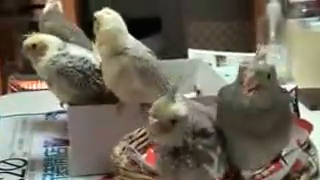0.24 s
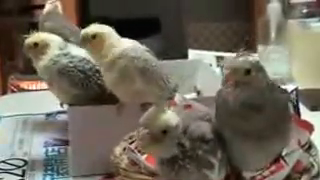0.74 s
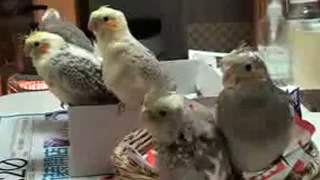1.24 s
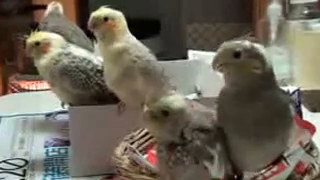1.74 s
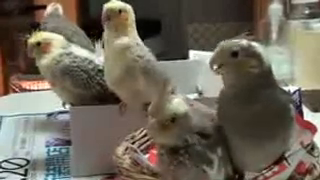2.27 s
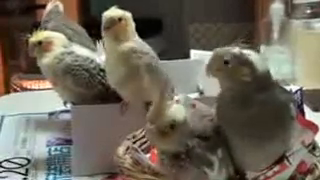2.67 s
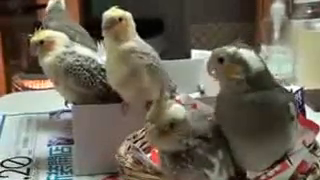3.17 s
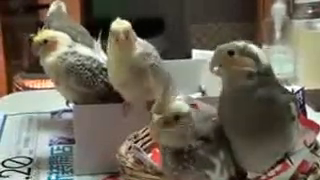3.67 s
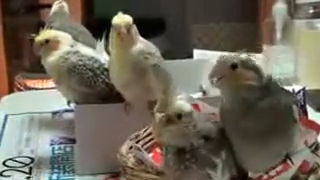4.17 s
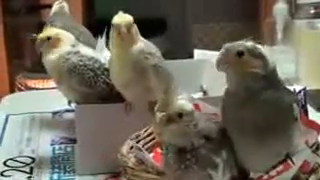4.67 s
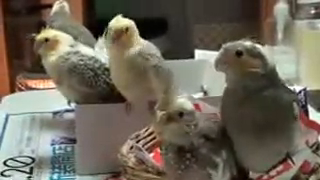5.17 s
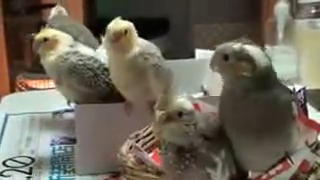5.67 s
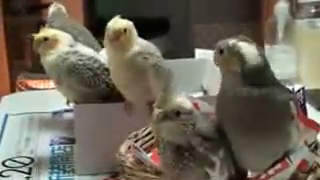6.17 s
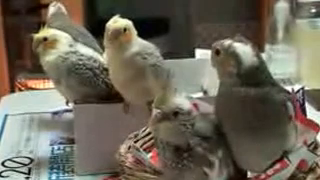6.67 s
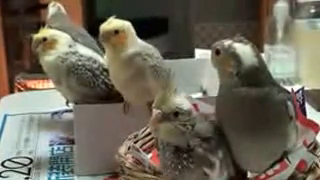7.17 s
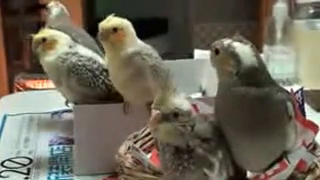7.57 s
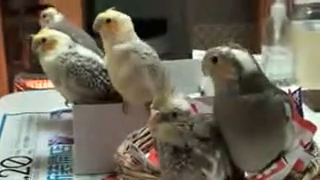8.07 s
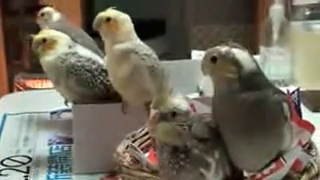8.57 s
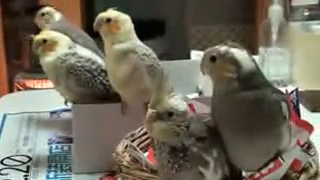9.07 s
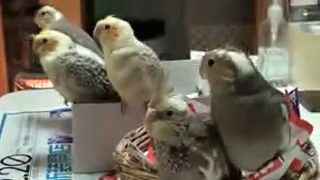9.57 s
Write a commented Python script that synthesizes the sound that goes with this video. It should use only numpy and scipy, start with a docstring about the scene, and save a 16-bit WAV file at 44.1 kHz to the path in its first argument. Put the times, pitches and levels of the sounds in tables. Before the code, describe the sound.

Raspy begging calls from young cockatiels repeat every half second or so, hiss turning to squeal, then thin out to sparse calls with quiet gaps.

```python
"""Cockatiel chicks beg for food in a small room. Each call starts as a hoarse, buzzing hiss; a rough tone
forms in it, clears, climbs with a warble to a squeal, and many calls end in a short upward yip. Now and then
one whines; a bird beats its wings, soft ticks sound late on, an appliance hums. Squeals and yips are whistles
with overtones, hisses are buzz and noise through throat resonances, whines are harmonic stacks, wings and
ticks are shaped noise; a room response and a narrow-band microphone with automatic gain follow."""
import sys
import numpy as np
from scipy import signal
from scipy.fft import rfft, irfft
from scipy.io import wavfile
from scipy.ndimage import uniform_filter1d

SR = 44100
rng = np.random.default_rng(int(sys.argv[2]) if len(sys.argv) > 2 else 0)


def waveform_to_disk(signal):
    """Save audio, clipped to [-1, 1], as 16-bit WAV at the path in sys.argv[1]."""
    frames = np.transpose(np.atleast_2d(signal))
    scaled = np.clip(frames, -1, 1) * 32767
    samples = np.round(scaled).astype(np.int16)
    wavfile.write(sys.argv[1], SR, samples)


N = 433503
TIME = np.arange(N) / SR


def from_db(db):
    """Decibels to amplitude gain."""
    return 10 ** (np.asarray(db) / 20)


def rms_one(x):
    """Scale to unit power."""
    return x / np.sqrt(np.mean(x ** 2) + 1e-20)


def at_hz(points, hz):
    """Interpolate (frequency [Hz], level [dB]) points on a log-frequency axis."""
    point_hz, point_db = np.transpose(points)
    return np.interp(np.log(np.maximum(hz, 1)), np.log(point_hz), point_db)


def noise(spectrum):
    """Unit-power Gaussian noise shaped by a spectrum."""
    gains = from_db(at_hz(spectrum, np.fft.rfftfreq(N, 1 / SR)))
    return rms_one(irfft(rfft(rng.standard_normal(N)) * gains, N))


def butter(x, hz, kind, order=2):
    """Causal low- or high-pass."""
    return signal.sosfilt(signal.butter(order, hz, kind, fs=SR, output="sos"), x)


def wander(rate_hz, size):
    """Random motion of unit spread, low-passed at the given rate."""
    settled = butter(rng.standard_normal(size + SR // 10), rate_hz, "low")[-size:]
    return rms_one(settled)


def resonate(x, hz, width_hz):
    """Two-pole resonance, about unit gain at its peak."""
    r = np.exp(-np.pi * width_hz / SR)
    zeros = np.array([1, 0, -1]) * (1 - r * r) / 2
    poles = [1, -2 * r * np.cos(2 * np.pi * hz / SR), r * r]
    return signal.lfilter(zeros, poles, x)


def gate(start_s, length_s, attack_s, release_s):
    """A call's sample indices, time since its start and on-off envelope."""
    first = max(int(start_s * SR), 0)
    last = min(int((start_s + length_s + release_s) * SR), N)
    at = np.arange(first, last)
    t = np.maximum(TIME[at] - start_s, 0)
    attack = np.clip(t / attack_s, 0, 1)
    release = np.clip(1 - (t - length_s) / release_s, 0, 1)
    return at, t, attack * release


def syrinx(pitch_hz, overtone_db, slope_db=-0.5):
    """Whistle of unit power with three overtones coloured by the beak; slope is dB per harmonic number."""
    # beak colour: (frequency [Hz], relative level [dB])
    beak = [(3000, 7), (3750, 14), (4500, -3.5), (5200, -2), (5900, -5.5), (6600, -15), (7300, 1),
            (8000, -12), (9000, -21)]
    phase = 2 * np.pi * np.cumsum(pitch_hz) / SR
    k = np.arange(2, 5)[:, None]
    gains = from_db(at_hz(beak, k * pitch_hz) + slope_db * k)
    gains *= from_db(overtone_db) / np.sqrt(np.sum(gains ** 2, axis=0))
    wave = np.sin(phase) + np.sum(gains * np.sin(k * phase), axis=0)
    return wave * np.sqrt(2 / (1 + from_db(overtone_db) ** 2))


def squeals(jitter=0.0768, jitter_hz=500, shimmer_db=2.5, shimmer_hz=450, accent_db=2.5, accent_s=0.0099,
            drift=0.0045, drift_hz=45):
    """A hoarse tone clears, climbs with a warble and falls; returns the sound and its clearness (0-1)."""
    # squeals, levels before the mix: (start [s], middle of clearing after start [s], clearing time [s],
    #   hold [s], climb [s], fall [s], low pitch [Hz], top pitch [Hz], end pitch [Hz],
    #   climb bend [1 straight, above 1 arched], hoarse level [dB], clear level [dB], top level [dB],
    #   extra overtones when low [dB], extra overtones at the top [dB], roughness once clear [0-1],
    #   warble dip [share of pitch], warble rate [Hz])
    calls = [ (-.05, .218, 0.012, .2, 0.11, 0.018, 1944, 2460, 2420, 1.05, -21, -16.5, -15, -2, 5.5, 0.017, 0.034, 45),
             (0.487, .066, 0.036, 0.069, 0.091, 0.032, 1934, 3074, 2716, 1.19, -19.5, -17, -13.5, 2, -3.5, 0.14, 0.14, 39.8),
             (1.548, 0.082, 0.037, 0.083, 0.12, 0.027, 1870, 2793, 2474, 0.88, -25.5, -15, -18.5, -1.5, 2, .06, 0.077, 41.1),
             (2.225, .082, .025, 0.076, 0.12, .015, 1873, 2430, 2380, 0.92, -19, -12.5, -19.5, 1, 2, 0.14, 0.022, 34.8),
             (3.095, 0.067, 0.024, 0.038, 0.1, 0.066, 1745, 3700, 2646, 2.3, -28, -14, -14.5, -3, -14, 0.31, .05, 30),
             (3.685, 0.082, 0.032, .13, 0.1, 0.039, 1903, 2476, 2110, .9, -25.5, -14.5, -18, 2.5, -0.5, 0.036, 0.047, 47.1),
             (4.181, 0.072, 0.0079, 0.078, 0.094, 0.026, 1868, 2617, 2370, 1.05, -22.5, -13.5, -18, 3, 2, 0.069, 0.054, 44.7),
             (4.674, 0.071, 0.019, 0.021, 0.09, 0.082, 1688, 3113, 2596, 1.37, -24.5, -15.5, -14, -2, -17.5, 0.22, 0.13, 37.3),
             (5.251, 0.22, 0.26, .17, .14, .047, 1830, 1946, 1903, 0.9, -25, -10, -11.5, 1, 2, 0.089, 0.014, 50),
             (5.855, .1, 0.014, .13, 0.11, 0.014, 1905, 2314, 2310, 1.1, -26.5, -13.5, -16.5, 1, -0.5, 0.027, 0.049, 35.8),
             (7.658, 0.064, 0.028, 0.056, 0.094, .015, 1762, 2830, 2737, 1.72, -27.5, -13.5, -17, -8.5, -9.5, 0.21, 0.19, 40.4),
             (9.446, 0.086, 0.017, 0.12, 0.074, 0.025, 1893, 2466, 2370, 1.06, -28, -15, -16.5, -5, -17.5, 0.065, 0.069, 37.4)]
    # overtone strength, high squeals are nearly pure: (pitch [Hz], overtones re fundamental [dB])
    richness = [(1650, -5), (1780, -2), (1890, 8.5), (2100, 5.5), (2450, 1), (2800, -4), (3100, -12),
                (3600, -13)]
    scoop_share, scoop_s = 0.1, 0.018  # starts under the low pitch and slides up
    hoarse_roughness, onset_clearing = 0.759, 0.62  # roughness 0-1; share of it missing at the onset
    warble_dip_db = 4
    fall_curve, fall_db_per_s = 1.6, 100.5  # the air runs out as the pitch falls
    out, clearness = np.zeros(N), np.zeros(N)
    for (start_s, hoarse_s, clearing_s, hold_s, climb_s, fall_s, low_hz, top_hz, end_hz, bend,
         hoarse_db, clear_db, top_db, low_extra_db, top_extra_db, grit, warble, warble_hz) in calls:
        top_s = hold_s + climb_s
        at, t, on = gate(start_s, top_s + fall_s, attack_s=0.0026, release_s=0.0036)
        n = len(at)
        clear = np.clip((t - hoarse_s) / clearing_s + 0.5, 0, 1)
        rising = 1 - np.clip((top_s - t) / climb_s, 0, 1) ** bend
        falling = np.clip((t - top_s) / fall_s, 0, 1) ** fall_curve
        pitch_hz = low_hz * (1 - scoop_share * np.exp(-t / scoop_s))
        pitch_hz = pitch_hz + (top_hz - low_hz) * rising + (end_hz - top_hz) * falling
        # a chain of arches with sharp dips; the last crest is the top of the call
        arches = np.abs(np.cos(np.pi * warble_hz * np.minimum(t - top_s, 0)))
        dip = clear * (1 - arches)
        pitch_hz = pitch_hz * (1 - warble * dip)
        overtone_db = at_hz(richness, pitch_hz) + low_extra_db + (top_extra_db - low_extra_db) * rising
        # pent-up pressure makes the first instant louder and cleaner
        accent = np.exp(-t / accent_s)
        rough = hoarse_roughness + (grit - hoarse_roughness) * clear
        rough = np.clip(rough * (1 - onset_clearing * accent), 0, 1)
        pitch_hz = pitch_hz * (1 + drift * wander(drift_hz, n) + jitter * rough * wander(jitter_hz, n))
        shake = rms_one(from_db(shimmer_db * rough * wander(shimmer_hz, n)))
        db = hoarse_db + (clear_db - hoarse_db) * clear + (top_db - clear_db) * rising
        db = db + accent_db * accent - warble_dip_db * dip - fall_db_per_s * fall_s * falling
        out[at] += on * from_db(db) * shake * syrinx(pitch_hz, overtone_db)
        clearness[at] = on * clear
    return out, clearness


def rasp_controls(clearness, breakup=0.74, breakup_hz=14):
    """Level, pitch, brightness and voiced share of the hisses; clear squeals take the air from them."""
    # hoarse hisses: (start [s], length [s], settled pitch [Hz], full level before ducking and mix [dB],
    #   swell [dB], brightness [dB], voiced share gained by the end, before breakup [0-1])
    hisses = [ (0.0, 0.2, 990, -23, 5, 1.5, 0.06), (0.49, 0.14, 988, -21.5, 5, 3, 0),
              (1.301, 0.48, 905, -25.5, 9, 6.5, 0.82), (1.976, 1, 936.7, -23.5, 9.5, 2.5, 0.41),
              (2.965, 0.33, 960, -19, 8.5, -1, 0), (3.543, 0.42, 908, -21.5, 13, -2, 0.01),
              (4.173, .5, 918, -27, -3.5, 1.5, .12), (5.022, 0.61, 908, -23, 10, 0, .05),
              (5.858, .16, 967, -27.5, -2.5, -3.5, 0), (7.659, .2, 910, -31.5, -2.5, 0.5, 0.4),
              (7.946, .16, 963.5, -20.5, 13, 1.5, 0.66), (8.399, 0.41, 880, -26.5, 6, 1.5, 0.51),
              (9.201, 0.81, 837.5, -32.5, 8, -7, 0.2)]
    # level and buzz pitch settle as the pressure builds
    swell_s, settle_share, settle_s = 0.13, 0.16, 0.11
    catch_share, catch_db, catch_s = 0.48, 1, 0.026  # the voice catches briefly at the onset
    brightening_db = 2  # from start to end of a hiss
    duck_db, duck_bright_db, return_hz = 6, 1, 4.4  # the low part ducks most; rate of return
    beak_wobble_db, beak_wobble_hz = 1.5, 12  # brightness shifts as the beak moves
    level, pitch_hz, bright_db, voiced = np.zeros(N), np.full(N, 900.), np.zeros(N), np.zeros(N)
    for start_s, length_s, hz, db, swell_db, brightness_db, voice in hisses:
        at, t, on = gate(start_s, length_s, attack_s=0.0024, release_s=0.008)
        catch = np.exp(-t / catch_s)
        level[at] = on * from_db(db - swell_db * np.exp(-t / swell_s) + catch_db * catch)
        pitch_hz[at] = hz * (1 - settle_share * np.exp(-t / settle_s))
        bright_db[at] = brightness_db + brightening_db * (t / length_s - 0.5)
        voiced[at] = catch_share * catch + voice * t / length_s
    voiced = np.clip(voiced * (1 + breakup * wander(breakup_hz, N)), 0, 1)
    duck = np.maximum(clearness, butter(clearness, return_hz, "low", order=1))
    bright_db = bright_db + duck_bright_db * duck + beak_wobble_db * wander(beak_wobble_hz, N)
    return level * from_db(-duck_db * duck), pitch_hz, bright_db, voiced


def throat(source, buzzing):
    """Parallel throat and beak resonances, then dips in the spectrum; unit power."""
    # resonances: (frequency [Hz], width [Hz], level for the hiss [dB], level for the buzz [dB])
    resonances = [(749, 280, -7.5, -9.5), (1647, 720, -3, 4), (2110, 433, 6.5, -6.5), (2890, 280, 0, -1),
                  (3450, 700, -2, 0), (4420, 1140, 2, -10), (5440, 720, 2.5, -1), (6183, 540, 3.5, 2.5),
                  (7895, 810, -4.5, -5)]
    # spectral dips: (frequency [Hz], width [Hz], depth [0-1])
    dips = [(3200, 70, 0.3), (5290, 390, 0.6), (6780, 690, 0.3)]
    voice, sign = 0, 1
    for hz, width_hz, hiss_db, buzz_db in resonances:
        db = buzz_db if buzzing else hiss_db
        voice = voice + sign * from_db(db) * resonate(source, hz, width_hz)
        sign = -sign
    for hz, width_hz, depth in dips:
        voice = voice - depth * resonate(voice, hz, width_hz)
    return rms_one(voice)


def rasps(clearness, jitter=0.036, steadying=0.56, jitter_hz=300, sway=0.009, sway_hz=22, puff=0.5,
          flutter_db=0.74, flutter_hz=260, tremble_db=1.25, tremble_hz=40, split_hz=4200, low_cut_hz=620):
    """Slack membranes buzz unevenly and chop the air stream; both sound through the throat."""
    level, pitch_hz, bright_db, voiced = rasp_controls(clearness)
    # more voice, steadier pitch
    uneven = jitter * (1 - steadying * voiced) * wander(jitter_hz, N)
    pitch_hz = pitch_hz * (1 + uneven + sway * wander(sway_hz, N))
    phase = 2 * np.pi * np.cumsum(pitch_hz) / SR
    unsteady = from_db(flutter_db * wander(flutter_hz, N) + tremble_db * wander(tremble_hz, N))
    # buzz and hiss arise at different places, so they drive the resonances differently
    pulses = sum(np.cos(k * phase) for k in range(1, 11))
    chopped_air = rng.standard_normal(N) * (1 + puff * np.cos(phase))
    buzz = throat(unsteady * pulses, buzzing=True)
    hiss = throat(unsteady * chopped_air, buzzing=False)
    voice = butter(np.sqrt(voiced) * buzz + np.sqrt(1 - voiced) * hiss, low_cut_hz, "high")
    # a wider beak tips the balance towards the treble
    low = butter(butter(voice, split_hz, "low"), split_hz, "low")
    high = butter(butter(voice, split_hz, "high"), split_hz, "high")
    return level * (low * from_db(-bright_db / 2) + high * from_db(bright_db / 2))


def yips(jitter=0.02, jitter_hz=700):
    """The syrinx snaps tight for an instant: a bright, slightly cracked upward chirp."""
    # yips: (start [s], length [s], start pitch [Hz], end pitch [Hz], peak level before the mix [dB],
    #   overtones re fundamental [dB])
    snaps = [(0.108, 0.0072, 2140, 2750, -16, -3), (1.773, 0.0072, 1860, 2050, -17.5, 11),
             (2.952, 0.014, 2080, 3140, -19.5, -11), (3.294, 0.017, 2120, 3310, -13, -6.5),
             (3.976, 0.0074, 2240, 2690, -17.5, -9), (4.663, .013, 1920, 2953, -16, -7.5),
             (5.607, 0.0091, 1880, 2290, -22.5, 1), (5.65, 0.011, 2070, 2800, -14, -3.5),
             (8.098, 0.012, 1830, 2670, -16.5, -5), (8.811, 0.0072, 1788, 2160, -17.5, 4.5)]
    out = np.zeros(N)
    for start_s, length_s, start_hz, end_hz, db, overtone_db in snaps:
        u = np.linspace(0, 1, int(length_s * SR))
        pitch_hz = start_hz + (end_hz - start_hz) * np.sin(np.pi / 2 * u)
        pitch_hz = pitch_hz * (1 + jitter * wander(jitter_hz, len(u)))
        swell = np.abs(np.sin(np.pi * u)) ** 0.9
        at = int(start_s * SR) + np.arange(len(u))
        out[at] += from_db(db) * swell * syrinx(pitch_hz, overtone_db, slope_db=0.5)
    return out


def whines(jitter=0.014, jitter_hz=200):
    """Regular, tight vibration: a clean stack of harmonics on a shallow arch of pitch."""
    # whines: (start [s], length [s], pitch [Hz], arch [share of pitch], level [dB], fade [dB/s],
    #   tilt [dB/octave])
    calls = [(1.502, .285, 906, -0.018, -19.5, 20, 2.5), (7.808, .155, 881, 0.063, -16.5, 76, -3)]
    # harmonic strength: (frequency [Hz], relative level [dB])
    colour = [(900, -38), (1800, 2), (2700, -4.5), (3600, 4.5), (4500, -16), (5500, 9.5), (6300, -10),
              (7200, 1.5), (8500, -26)]
    out = np.zeros(N)
    for start_s, length_s, hz, arch, db, fade_db_per_s, tilt_db in calls:
        at, t, on = gate(start_s, length_s, attack_s=0.035, release_s=0.019)
        pitch_hz = hz * (1 + arch * np.sin(np.pi * (t / length_s) ** 0.7))
        phase = 2 * np.pi * np.cumsum(pitch_hz * (1 + jitter * wander(jitter_hz, len(at)))) / SR
        stack = 0
        for k in range(1, 10):
            gain = from_db(at_hz(colour, k * pitch_hz) + tilt_db * np.log2(k))
            stack = stack + gain * np.sin(k * phase + rng.uniform(0, 2 * np.pi))
        out[at] += on * from_db(db - fade_db_per_s * t) * rms_one(stack)
    return out


def wings(rustle_db=1.5, rustle_hz=350, push_hz=190, push_width_hz=150):
    """Each beat is a rush of air, grainy with feathers brushing past each other, over a low push."""
    # wing beats: (start [s], level before the mix [dB], swell [s], hold [s], fade [s],
    #   low push of air re rustle [dB])
    beats = [(0.872, -25, 0.0093, 0.017, 0.06, -8), (1.017, -21, 0.024, 0.031, 0.032, -24),
             (1.06, -19, 0.0099, 0.044, 0.037, -28)]
    # rustle density: (frequency [Hz], relative level [dB])
    feathers = [(53, -43), (90, -18), (216, -0.5), (639, -3), (1010, 3), (1340, -3), (2660, -3.5),
                (3280, -9), (5590, -11), (8500, -16), (11000, -47), (18700, -120)]
    power, push_power = 0, 0
    for start_s, db, swell_s, hold_s, fade_s, push_db in beats:
        t = TIME - start_s
        stroke = from_db(db) * np.clip(t / swell_s, 0, 1) * np.exp(-np.maximum(t - hold_s, 0) / fade_s)
        power = power + stroke ** 2
        push_power = push_power + (stroke * from_db(push_db)) ** 2
    rustle = rms_one(noise(feathers) * from_db(rustle_db * wander(rustle_hz, N)))
    push = resonate(rng.standard_normal(N), push_hz, push_width_hz)
    push = rms_one(resonate(push, push_hz, push_width_hz))
    return np.sqrt(power) * rustle + np.sqrt(push_power) * push


def ticks(hz=3450, width_hz=450, swell_s=0.016):
    """Tiny husky sounds from a nearly closed beak: resonant noise in short swells."""
    # ticks: (time, half a swell before the peak [s], peak level before the mix [dB])
    clicks = [(6.288, -48), (6.46, -55.5), (6.63, -55), (6.795, -57), (6.96, -52), (7.39, -71),
              (8.254, -57), (8.9, -61)]
    level = 0
    for time_s, db in clicks:
        u = np.clip((TIME - time_s) / swell_s + 0.5, 0, 20)
        level = level + from_db(db) * u * np.exp(1 - u)
    return level * rms_one(resonate(rng.standard_normal(N), hz, width_hz))


def room(x, first_s=0.0039, early_s=0.036, wall_hz=7000, t60_s=0.21, early_db=-35, tail_db=-11):
    """Quick reflections from the table and box, plus a short diffuse tail, as decaying noise."""
    t = TIME[:SR // 2]
    early = rng.standard_normal(len(t)) * np.exp(-t / early_s) * (t > 0.001)
    tail = rng.standard_normal(len(t)) * from_db(-60 * t / t60_s) * (t > first_s)
    tail = butter(tail, wall_hz, "low", order=1)
    response = from_db(early_db) * early / np.linalg.norm(early)
    response = response + from_db(tail_db) * tail / np.linalg.norm(tail)
    return x + signal.fftconvolve(x, response)[:N]


def background(tone_db=-53.5, waver=0.0062, waver_hz=11.1):
    """Steady room noise and a slightly wavering motor hum."""
    # room noise density: (frequency [Hz], relative level [dB])
    room_tone = [(15, -46.5), (25, -18), (70, -26.5), (127, -15), (188, -16), (224, -5), (253, -18),
                 (385, -18.5), (469, -20), (645, -20), (2440, -27.5), (3360, -27), (4300, -30.5),
                 (5110, -29.5), (9000, -34.5), (11700, -72.5), (19800, -120)]
    # appliance hum: (frequency [Hz], RMS level before the mix [dB])
    hum_tones = [(222.6, -56.5), (138, -73.5), (327, -68), (379, -68)]
    turns_s = np.cumsum(1 + waver * wander(waver_hz, N)) / SR
    hum = sum(from_db(db) * np.sqrt(2) * np.sin(2 * np.pi * hz * turns_s) for hz, db in hum_tones)
    return hum + from_db(tone_db) * noise(room_tone)


def gain_control(x, ceiling_db=-18, range_db=5, recovery_db_per_s=2.5, window_s=0.004):
    """Loud calls push the gain down, at most by its range; it starts there and creeps back in the pauses."""
    power = uniform_filter1d(x ** 2, max(int(window_s * SR), 1))
    excess_db = np.clip(10 * np.log10(np.maximum(power, 1e-12)) - ceiling_db, 0, range_db)
    recovery_db = recovery_db_per_s * TIME
    held_db = np.maximum.accumulate(np.maximum(excess_db + recovery_db, range_db), axis=-1)
    return x * from_db(recovery_db - held_db)


def scene(squeal_db=4.5, rasp_db=3.0, yip_db=4, wing_db=5.0, tick_db=2, background_db=3.5):
    """Mix the birds, add the room's response, lay the background under them."""
    tones, clearness = squeals()
    birds = from_db(squeal_db) * tones
    birds = birds + from_db(rasp_db) * rasps(clearness)
    birds = birds + from_db(yip_db) * yips() + whines()
    birds = birds + from_db(wing_db) * wings() + from_db(tick_db) * ticks()
    mix = room(birds) + from_db(background_db) * background()
    return mix[None]


def record(dry, top=0.46, cutoff_hz=8650):
    """A small microphone with automatic gain, rounded peaks and a narrow band."""
    x = gain_control(dry)
    x = x / (1 + (x / top) ** 8) ** (1 / 8)
    band = signal.ellip(10, 0.3, 80, cutoff_hz, fs=SR, output="sos")
    return signal.sosfilt(band, x)


dry = scene()
out = record(dry)
waveform_to_disk(out)
```